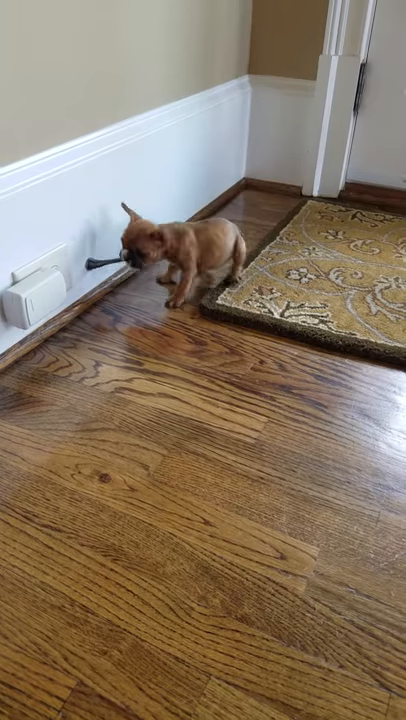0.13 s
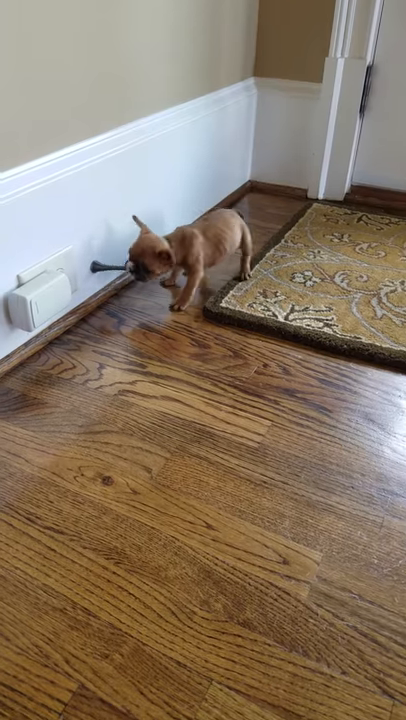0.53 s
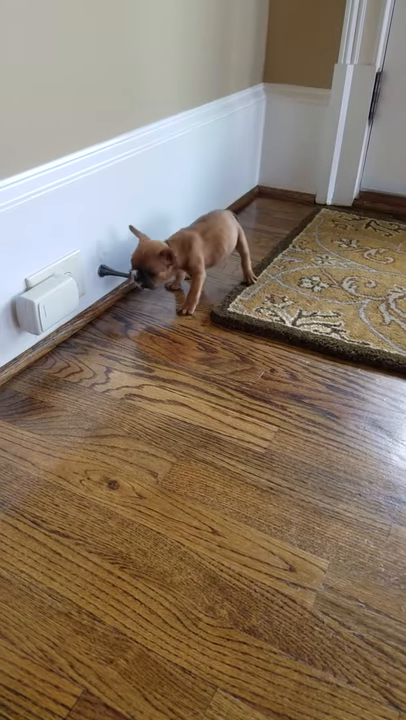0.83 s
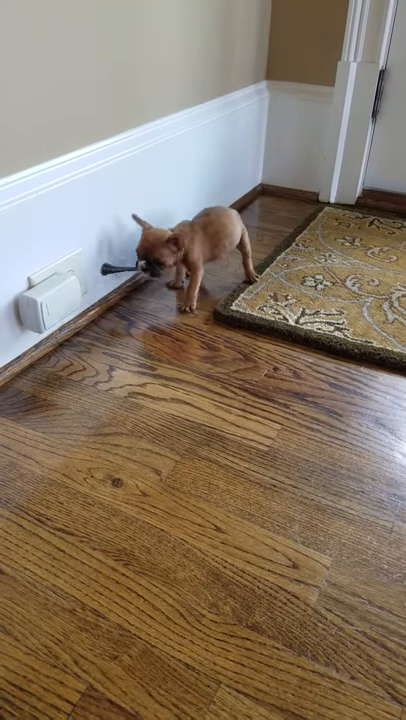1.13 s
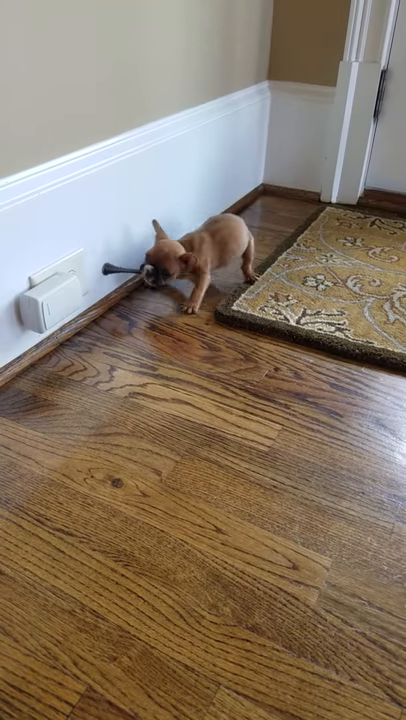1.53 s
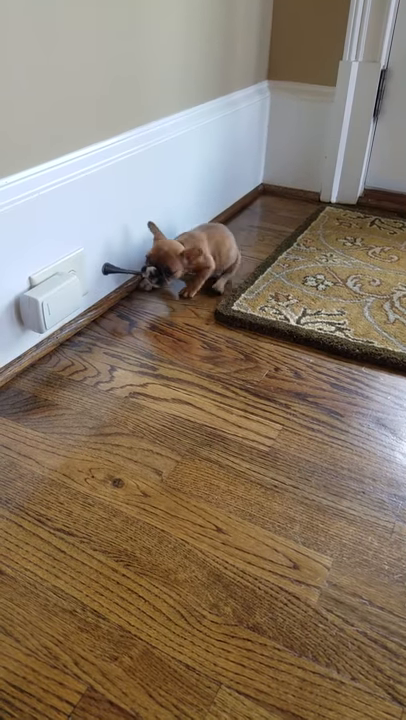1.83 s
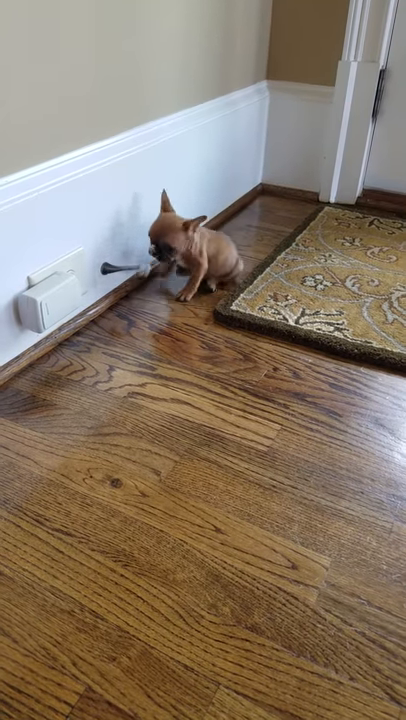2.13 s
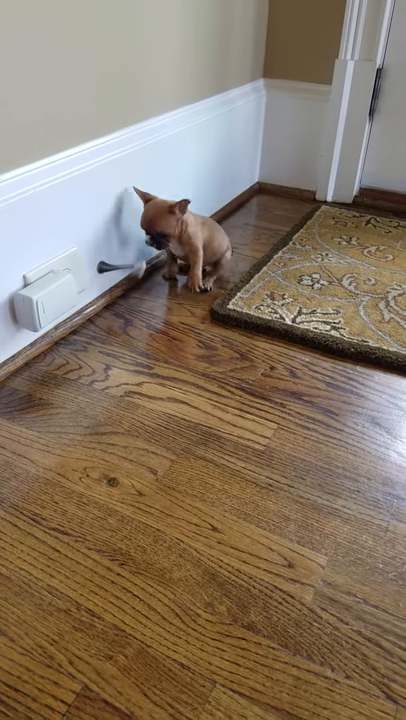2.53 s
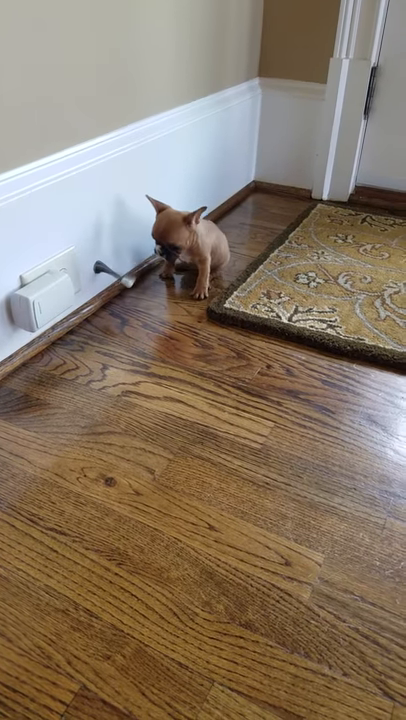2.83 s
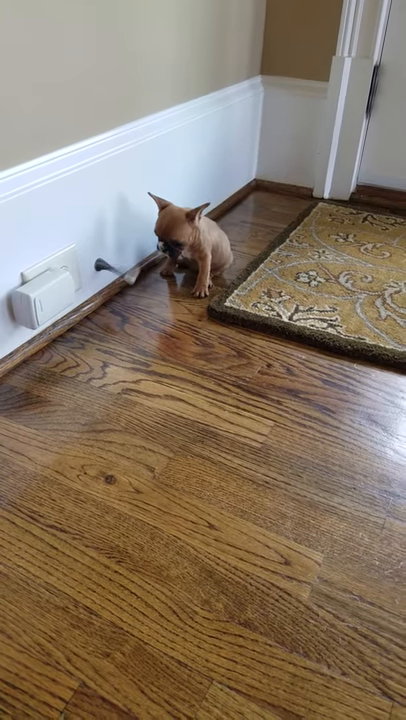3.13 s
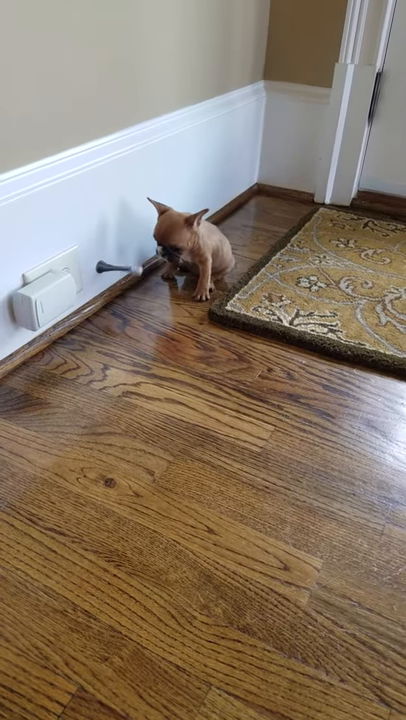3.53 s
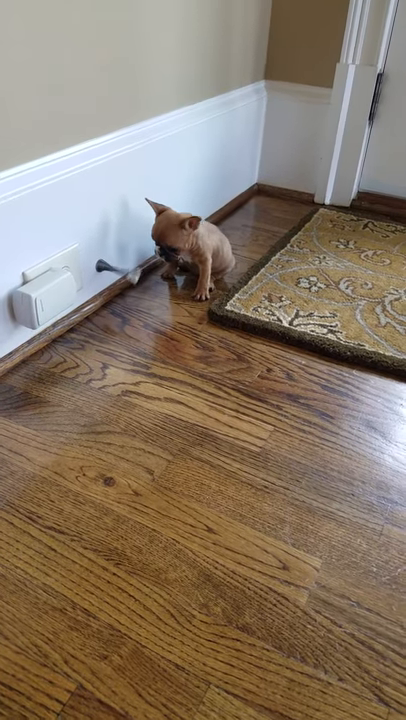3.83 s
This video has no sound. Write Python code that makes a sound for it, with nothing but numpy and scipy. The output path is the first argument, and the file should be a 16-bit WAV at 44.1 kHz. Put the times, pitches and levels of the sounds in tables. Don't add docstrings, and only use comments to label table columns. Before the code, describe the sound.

A spring door stopper buzzes against a baseboard. For the first two seconds there is only soft room hum, faint paw pats, small claw ticks around 0.6 s and fur rustle, with firmer bumps near 1.8 s. At 2.0 s the coil is released: loud rapid woody knocks, metallic ticks and hollow wall boom, gradually quickening and weakening until cut off near 4 s, left-leaning, with live room echo.

```python
import sys
import numpy as np
from scipy import signal
from scipy.fft import rfft, irfft, next_fast_len
from scipy.io import wavfile

SR = 44100
rng = np.random.default_rng(int(sys.argv[2]) if len(sys.argv) > 2 else 0)


def store_wav(level_fs):
    pcm = np.round(np.clip(np.atleast_2d(level_fs), -1, 1) * 32767)
    wavfile.write(sys.argv[1], SR, pcm.T.astype(np.int16))


def ratio_of_db(decibels):
    return 10 ** (np.asarray(decibels, float) / 20)


N = 176400
PUFF = 512
FLOOR_S, CORNER_S = .0036, .0142
QUIET_TOP_HZ = 15900


def unit(x):
    return x / np.sqrt(np.mean(x ** 2) + 1e-20)


def along(points, hz):
    f, v = np.transpose(points)
    return np.interp(np.log(hz + 1), np.log(f + 1), v)


def filtered(x, response):
    m = next_fast_len(N + SR // 2)
    return irfft(rfft(x, m) * response(np.fft.rfftfreq(m, 1 / SR)), m)[..., :N]


def peak(f, hz, width_hz):
    return 1j * f * width_hz / (hz * hz - f * f + 1j * f * width_hz)


def body(f, modes, sign=1):
    return sum(sign ** k * ratio_of_db(db) * peak(f, hz, w) for k, (hz, w, db) in enumerate(modes))


def causal(points, size=2048):
    cep = irfft(np.log(ratio_of_db(along(points, np.fft.rfftfreq(size, 1 / SR)))), size)
    cep = cep * np.r_[1, 2 * np.ones(size // 2 - 1), np.zeros(size // 2)]
    pulse = irfft(np.exp(rfft(cep)), size)[:size // 2]
    return pulse / np.abs(pulse).max()


def train(times, gains, shape):
    at = np.round(times * SR).astype(int)[:, None] + np.arange(shape.shape[-1])
    return np.bincount(at.ravel(), (gains[:, None] * shape).ravel(), N + SR)[:N]


def puff(count, t60):
    rows = rng.standard_normal((count, PUFF)) * ratio_of_db(-60 * np.arange(PUFF) / SR / t60)
    return rows / np.linalg.norm(rows, axis=1)[:, None]


def pair(x, alike):
    turn = lambda hz: np.arccos(np.clip(along(alike, hz), -1, 1)) / 2
    mid, side = filtered(x, lambda hz: np.array([np.cos(turn(hz)), np.sin(turn(hz))]))
    return np.array([mid + side, mid - side])


# [swings, t/s]
SWING_TIMES = [(0, 1.9807), (4, 2.2569), (8, 2.5242), (12, 2.7846), (16, 3.038), (20, 3.2839), (24, 3.5217),
               (28, 3.7513), (32, 3.9719)]
# [swing, delay/ms]
FRONT_LATE = [(0, .4), (1, .75), (5, .7), (6.5, .2), (12, .25), (20, .55), (27, .25), (32, .4)]


def slap_times():
    swing = np.arange(0, 33, .5)
    back = np.arange(len(swing)) % 2
    curve = np.polyfit(*np.transpose(SWING_TIMES), deg=4)
    times = np.polyval(curve, swing) + back * swing * .000022
    late_ms = np.where(back, .15, np.interp(swing, *np.transpose(FRONT_LATE)))
    return times + late_ms / 1000, back


def back_lag(back, first_s, last_s):
    return back * np.linspace(first_s, last_s, len(back))


# [f/Hz, level/dB]
KNOCK_COLOUR = [(400, -24), (900, -7), (1250, 2), (1600, -4), (2100, -16), (3000, -25), (4300, -32),
                (16000, -45)]


def knock(times, gains, contact):
    return signal.fftconvolve(train(times, gains, contact), causal(KNOCK_COLOUR))[:N]


# [f/Hz, level/dB]
TICK_COLOUR = [(2500, -7), (4500, -5), (5800, -1), (8000, 6.5), (10500, 2), (13500, 6.5), (15000, 6.5),
               (16500, -1)]


def tick(times, back, gains):
    lag_s = .0002 + back_lag(back, .001, .002)
    click = .5 * (1 - back[:, None]) * np.eye(1, PUFF)
    touch = click + 1.16 * puff(count=len(times), t60=0.0082)
    return signal.fftconvolve(train(times + lag_s, gains / 2, touch), causal(TICK_COLOUR))[:N]


# [f/Hz, width/Hz, level/dB]
BOARD_MODES = [(263, 93, -12.5), (302, 25.6, -1), (363.4, 52, -7), (475.4, 102, -6), (536, 56, -8),
               (600.6, 46, -13.5), (684, 58, -6.5), (821, 83, -1.5), (1037, 170, -1.5), (1294, 34, 3.5)]


def thud(times, back, gains, contact):
    soft_hz, stiff_hz = 1100, 170
    push = train(times + back_lag(back, .006, .002), gains, contact)

    def board(f):
        soft = (1 + 1j * f / soft_hz) ** 2
        stiff = (1j * f / (stiff_hz + 1j * f)) ** 2
        return body(f, BOARD_MODES) / soft * stiff
    return filtered(push, board)


# [f/Hz, width/Hz, level/dB]
WALL_MODES = [(122, 23, -8.5), (160.4, 27.8, 0.5), (178.6, 16.7, -8.5)]
# [t/s, level/dB]
BOOM_LEVEL = [(1.98, 17.5), (2.2, 10), (2.6, 16.5), (2.95, 11.5), (3.3, 15), (3.6, 7), (3.9, 8)]


def boom(times):
    level_db = np.interp(times, *np.transpose(BOOM_LEVEL)) + 1.5 * rng.standard_normal(len(times))
    return filtered(train(times + .004, ratio_of_db(level_db), -np.ones((1, 1))), lambda f: body(f, WALL_MODES))


# [f/Hz, width/Hz, level/dB]
MOUNT_MODES = [(1810, 190, -12), (2230, 330, -7), (2950, 370, -6), (3856, 460, -14)]


def mount(times, gains, rattle_s):
    shake = .8 * puff(count=len(times), t60=rattle_s) - 0.38 * np.eye(1, PUFF)
    late = lambda f: np.exp(-2j * np.pi * f * FLOOR_S)
    return ratio_of_db(19.5) * filtered(train(times, gains, shake), lambda f: body(f, MOUNT_MODES, -1) * late(f))


# [t/s, knock front level/dB, knock back level/dB, thud front level/dB,
# thud back level/dB, tick front level/dB, tick back level/dB]
SLAP_LEVELS = [(1.979, -12.5, -17, -12.5, -28, -5, -36), (2.048, -15.5, -21, -12, -10, -6, -23),
               (2.12, -10, -14, -8, -24.5, -15, -21), (2.19, -9.5, -15.5, -9, -12, -9.5, -21),
               (2.262, -19, -16.5, -11.5, -21.5, -14, -19.5), (2.39, -16, -21.5, -16.5, -16, -10, -19),
               (2.52, -14.5, -15, -19.5, -18, -8.5, -26), (2.66, -17, -16, -18.5, -19.5, -11.5, -20),
               (3.04, -17.5, -16.5, -26.5, -21.5, -12, -19), (3.15, -17.5, -24, -40, -14.5, -16.5, -23),
               (3.4, -18.5, -24, -33, -18, -13.5, -20.5), (3.52, -18, -26, -23, -19, -15, -39),
               (3.7, -23, -21, -23, -22, -18.5, -18.5), (3.76, -30, -19, -20, -26, -28, -17.5),
               (3.86, -17.5, -22.5, -23.5, -18, -26, -12), (4, -21, -19.5, -20, -41, -18.5, -22.5)]


def spring():
    times, back = slap_times()
    count, rattle_s = len(times), 0.013
    s, *columns = np.transpose(SLAP_LEVELS)
    levels = [np.interp(times, s, column) for column in columns]
    knock_db, thud_db, tick_db = [np.where(back, levels[k + 1], levels[k]) for k in (0, 2, 4)]
    luck = ratio_of_db(1.5 * rng.standard_normal((count, 3))).T
    loose = .25 * (times - times[0])[:, None]
    contact = -(1 - loose / 2) * np.eye(1, PUFF)
    contact = contact + loose * puff(count=2, t60=rattle_s)[back]
    contact = contact + 0.25 * puff(count=count, t60=rattle_s)
    slaps = knock(times, ratio_of_db(knock_db - 1.45) * luck[0], contact)
    slaps = slaps + mount(times, ratio_of_db(knock_db), rattle_s)
    slaps = slaps + thud(times, back, ratio_of_db(thud_db + 31) * luck[1], contact)
    slaps = slaps + tick(times, back, ratio_of_db(tick_db) * luck[2])
    return slaps + boom(times)


# [t/s, level/dB, f/Hz, t60/s]
PAW_BUMPS = [
    (0.074, -60, 231, 0.067),
    (0.147, -54.5, 228, 0.064),
    (.315, -55, 583, 0.023),
    (1.743, -48.5, 169, 0.072),
    (1.7706, -34.5, 162, 0.033),
    (1.802, -54, 228, 0.095),
    (1.845, -53, 265, 0.018),
    (1.947, -60, 155, 0.064),
]


def paw_bumps():
    t = np.arange(SR // 4) / SR
    s, db, hz, t60 = np.array(PAW_BUMPS).T[:, :, None]
    swell = 3 * (1 - np.exp(-t / 0.0026))
    return train(s[:, 0], ratio_of_db(db[:, 0]), np.sin(2 * np.pi * hz * t) * ratio_of_db(-60 * t / t60) * swell)


# [t/s, level/dB, f/Hz, width/Hz]
CLAW_TICKS = [(.047, -62.5, 6500, 12100), (.305, -66, 9000, 7000), (0.543, -45.5, 1150, 1490),
              (.62, -36.5, 615, 300), (1.02, -56, 1500, 1970), (.657, -61, 10400, 6000),
              (.694, -57, 12200, 6000), (1.07, -65, 10100, 3000), (1.115, -61, 11600, 5000),
              (1.57, -50, 1780, 2500), (1.81, -40, 1920, 900), (1.828, -35.5, 880, 900),
              (1.91, -43.5, 700, 600)]


def claw_ticks():
    ticks = np.zeros(N)
    for s, db, hz, width in CLAW_TICKS:
        touch = train(np.array([s]), ratio_of_db([db + 20.0]), puff(count=1, t60=0.0063))
        ticks = ticks + filtered(touch, lambda f: peak(f, hz, width) ** 2)
    return ticks


# [middle t/s, half length/s, level/dB]
FUR_STROKES = [
    (0.051, 0.013, -63),
    (.135, 0.046, -64),
    (0.68, 0.052, -70.5),
    (1.51, 0.047, -63),
    (1.617, 0.091, -74),
    (1.71, 0.052, -67),
    (1.81, 0.044, -66.5),
    (1.88, 0.22, -66.5),
]
# [f/Hz, level/dB]
FUR_COLOUR = [(500, 2), (2000, -1.5), (5000, -8), (7500, -3.5), (13500, -6), (16000, 0.5)]


def fur_rustle():
    clock = np.arange(N) / SR
    stroke = sum(ratio_of_db(db) * np.exp(-((clock - s) / half) ** 2) for s, half, db in FUR_STROKES)
    hair = filtered(rng.standard_normal((2, N)), lambda f: ratio_of_db(along(FUR_COLOUR, f)) * (f > 300))
    return stroke * unit(hair)


# [f/Hz, t60/s]
ROOM_DECAY = [(100, 0.57), (500, 0.96), (2000, 1), (6000, 1), (15000, 0.28)]
# [f/Hz, level/dB]
ROOM_COLOUR = [(100, -5), (400, 2), (900, -0.5), (1300, -9.5), (2000, 2.5), (3200, 1), (6000, -0.5),
               (15000, -0.5)]
# [f/Hz, likeness from -1 to 1]
TAIL_ALIKE = [(100, 0), (300, 1), (600, 0.14), (2000, 0), (15000, 0.31)]


def room(x):
    noise = pair(rng.standard_normal((2, N)), TAIL_ALIKE)[:, :SR // 2]
    hz, t, z = signal.stft(noise, SR, nperseg=256)
    tail = signal.istft(z * ratio_of_db(-60 * t / along(ROOM_DECAY, hz)[:, None]), SR, nperseg=256)[1]
    tail = tail * (1 - np.exp(-np.arange(tail.shape[1]) / SR / 0.00043))
    tail = tail / np.linalg.norm(tail[0]) * ratio_of_db([[2.5], [-2.5]])
    wet = signal.fftconvolve(x[None], tail, axes=1)[:, :N]
    return filtered(wet, lambda f: ratio_of_db(along(ROOM_COLOUR, f)))


# [f/Hz, level/dB per Hz]
AIR_COLOUR = [(25, -6.5), (50, -17.5), (127, -4.5), (250, -7.5), (600, -15), (2000, -24), (6000, -38.5),
              (16000, -34)]
# [f/Hz, likeness from -1 to 1]
AIR_ALIKE = [(60, 0.14), (380, 0.36), (2380, -0.08), (15000, 0.038)]
# [f/Hz, width/Hz, level/dB]
HUM_BANDS = [(59, 20, -68), (122.4, 19, -72.5), (259, 20.5, -71.5)]


def air():
    colour = lambda hz: ratio_of_db(along(AIR_COLOUR, hz) - along(MIC_COLOUR, hz) * (hz < 130))
    tone = pair(filtered(rng.standard_normal((2, N)), colour), AIR_ALIKE)
    hum = np.zeros(N)
    for hz, width, db in HUM_BANDS:
        hum = hum + ratio_of_db(db) * unit(filtered(rng.standard_normal(N), lambda f: peak(f, hz, width) ** 2))
    return (ratio_of_db(-59.5) * unit(tone) + hum) * ratio_of_db([[4.5], [-4.5]])


# [f/Hz, level/dB]
FLOOR_ECHO = [(300, -12), (800, -3), (1300, -7), (2200, -5), (3200, -3), (5000, -8), (8000, -13),
              (15000, -14)]
# [f/Hz, level/dB]
CORNER_ECHO = [(300, -6), (1200, -11), (3000, -9), (8000, -14), (15000, -15)]
# [f/Hz, level/dB]
LEFT_OVER_RIGHT = [(60, 4), (240, 13.5), (950, 9), (2000, 6), (3770, 13), (8000, 14.5), (15000, 12)]


def scene():
    near = spring() + paw_bumps() + claw_ticks()
    fur = fur_rustle()
    echo = lambda f, delay, colour: ratio_of_db(along(colour, f)) * np.exp(-2j * np.pi * f * delay)
    early = filtered(near, lambda f: 1 + echo(f, FLOOR_S, FLOOR_ECHO) + echo(f, CORNER_S, CORNER_ECHO))
    treble = filtered(early, lambda f: f * f / (f * f + 550 ** 2))
    far = early - treble + signal.fftconvolve(treble, puff(count=1, t60=0.003)[0])[:N]
    direct = filtered(np.array([early, far]), lambda f: ratio_of_db(np.outer([.5, -.5], along(LEFT_OVER_RIGHT, f))))
    background = room(near) + fur * ratio_of_db([[3], [-3]]) + air()
    return direct + filtered(background, lambda f: f < QUIET_TOP_HZ)


def top_cut(x):
    return signal.sosfilt(signal.butter(12, 16810, fs=SR, output="sos"), x)


# [f/Hz, level/dB]
MIC_COLOUR = [(40, -13), (90, -2.5), (130, 2.5), (7800, 7), (9200, 1), (11500, 7), (13300, 13),
              (15800, 4.5)]


def record(dry):
    top_level, top_hz = .93, 16700
    x = filtered(dry, lambda hz: ratio_of_db(along(MIC_COLOUR, hz)))
    x = x / (1 + np.abs(x / top_level) ** 6) ** (1 / 6)
    mix = filtered(x, lambda hz: (hz < top_hz) * ratio_of_db(-9 * (hz > QUIET_TOP_HZ)))
    return top_cut(mix)


dry = scene()
out = record(dry)
store_wav(out)
```